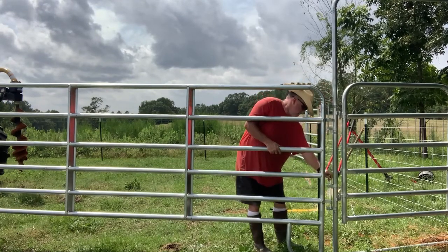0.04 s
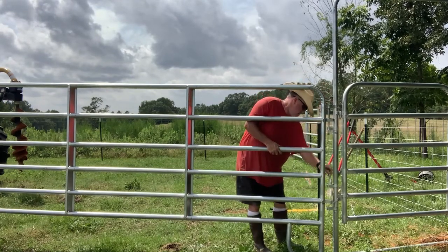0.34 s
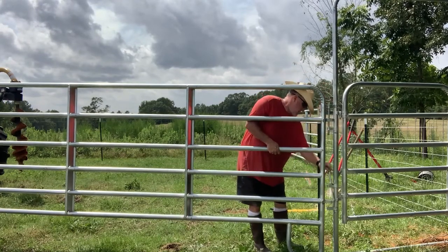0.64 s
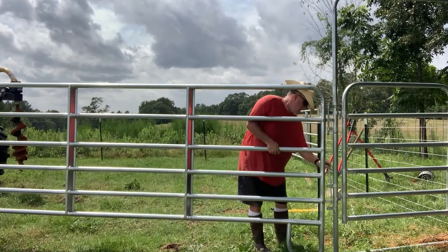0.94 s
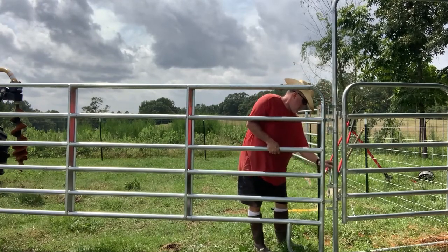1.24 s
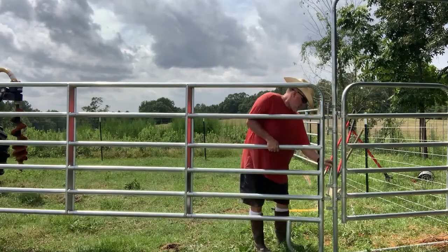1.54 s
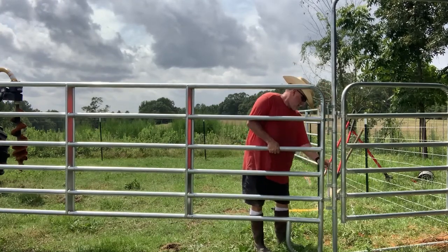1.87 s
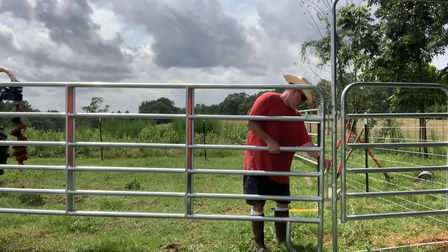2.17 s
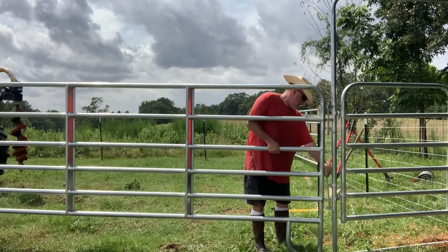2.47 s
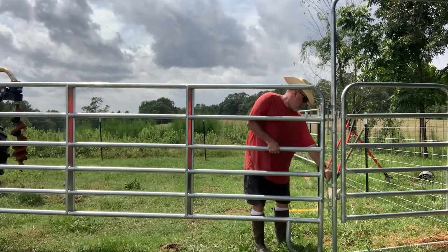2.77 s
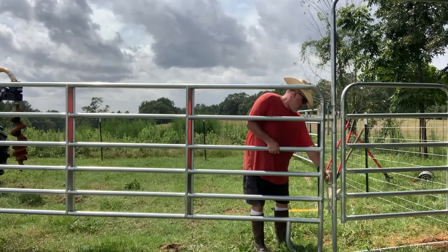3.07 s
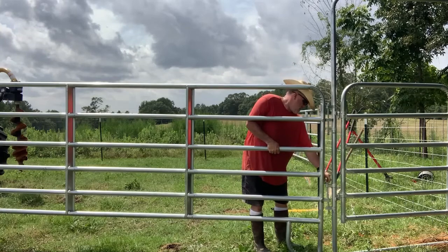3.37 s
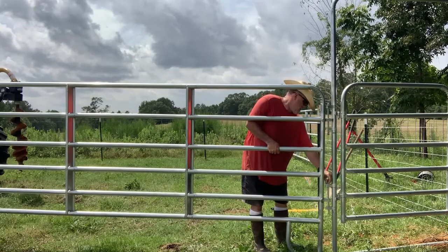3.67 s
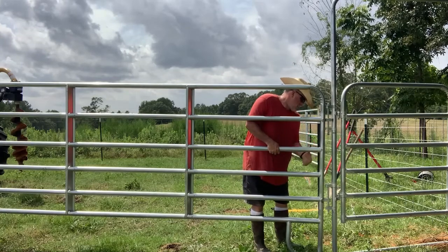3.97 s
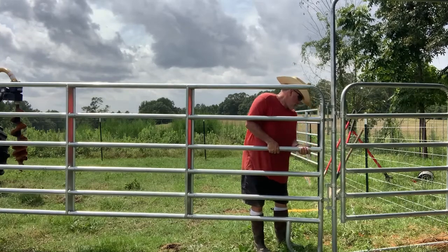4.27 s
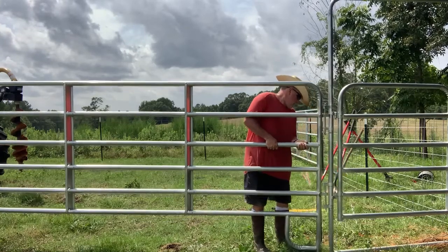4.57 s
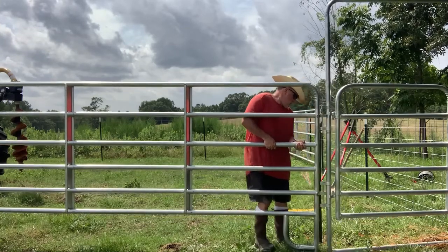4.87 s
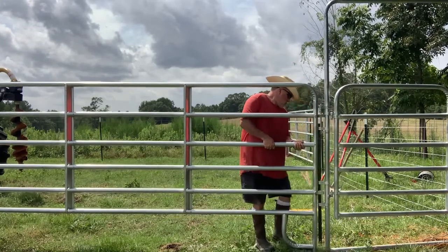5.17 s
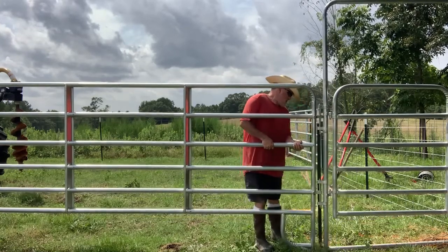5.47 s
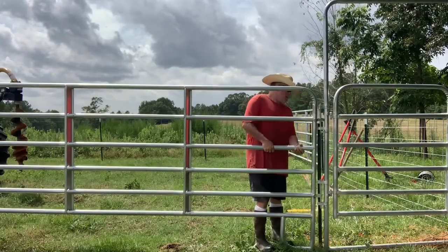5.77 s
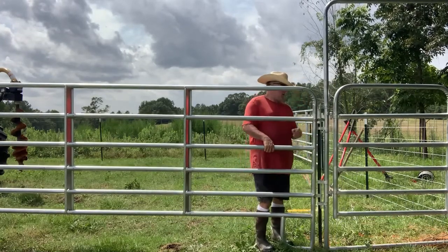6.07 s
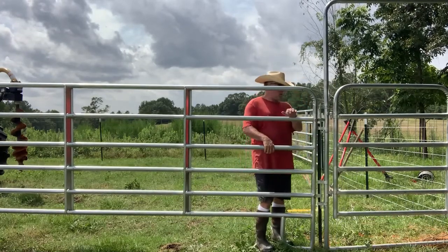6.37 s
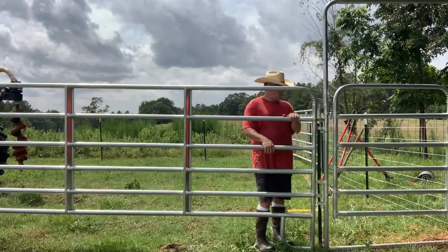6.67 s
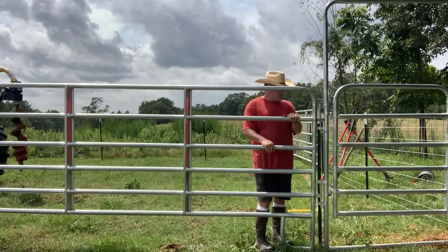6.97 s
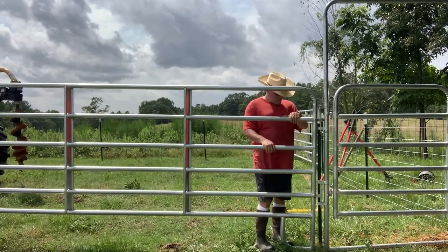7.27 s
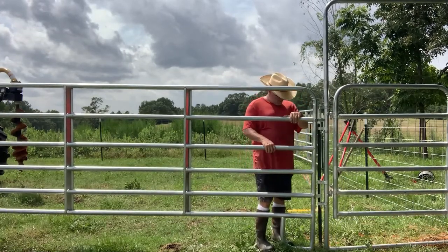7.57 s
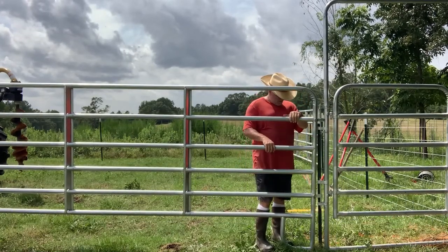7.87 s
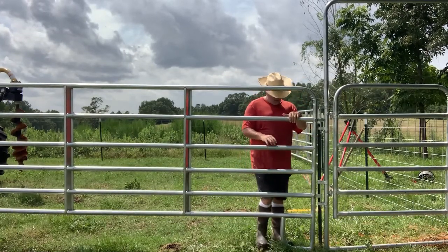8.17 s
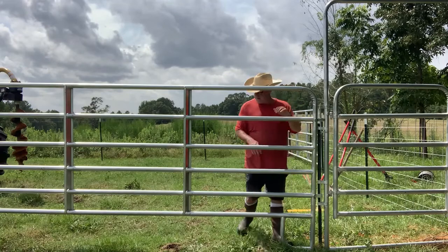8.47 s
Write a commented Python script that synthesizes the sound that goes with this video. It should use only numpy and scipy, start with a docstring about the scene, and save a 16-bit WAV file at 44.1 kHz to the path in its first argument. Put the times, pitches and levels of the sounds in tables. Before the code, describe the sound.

Steel gate panels clank, rattle and scrape as they are fitted together outdoors, with chain jingles and light wind.

```python
"""Galvanized steel corral panels clank as they are shaken and fitted together in a field, a few metres off.
Each blow cracks, rings hundreds of tube modes and sets a chain and the loose joints chattering.
Tubes stick and slip in short scrapes, a latch pin pings in its sleeve and thin fittings clink.
Underneath, a light wind buffets the microphone, a motor drones far off and insects hiss in the grass."""
import sys
import numpy as np
from scipy import signal
from scipy.fft import rfft, irfft
from scipy.io import wavfile
from scipy.ndimage import uniform_filter1d

SR = 44100
rng = np.random.default_rng(int(sys.argv[2]) if len(sys.argv) > 2 else 0)


def file_out(sig):
    """Save sig as 16-bit WAV at sys.argv[1]."""
    # one column per channel
    cols = np.atleast_2d(sig).T
    # limit, then scale
    lim = np.clip(cols, -1, 1)
    pcm = np.round(lim * 32767).astype(np.int16)
    wavfile.write(sys.argv[1], SR, pcm)


N = 381024
TIME, SCENE_HZ = np.arange(N) / SR, np.arange(N // 2 + 1) * SR / N
RING_S, RING_HZ = np.arange(SR) / SR, np.arange(SR // 2 + 1.)  # axes of a one-second ring

# a blow's four bands, called body, clang, clash and edge: (bottom [Hz], top [Hz])
BANDS = [(400, 1900), (2000, 3500), (4000, 8000), (10000, 12500)]
# tube strikes tube: (time [s], body level [dB], clang over body [dB], clash over body [dB],
# bite = edge over clash [dB], favoured note [Hz])
TUBE_STRIKES = [(0.024, -34, -12, -4.5, -5, 1280), (0.057, -29.5, -9, -7, 4, 860),
                (0.221, -25.5, -11, -19, -4, 1420), (0.302, -25, -12, -8.5, 2, 1450),
                (0.503, -39.5, -11, -11, 4, 1320), (0.672, -44, -6.5, -10.5, -10, 1050),
                (0.785, -45, -7, -6, -2, 1380), (0.821, -29.5, -7, -9, 7, 1400),
                (1.076, -49.5, -2, -5.5, -7, 940), (1.371, -15.5, -8.5, -24.5, -4.5, 1470),
                (1.419, -20, -12, -39, 9, 1350), (1.666, -24.5, -19.5, -16, -9, 680),
                (1.847, -25, -12, -6, 3, 980), (1.977, -28.5, -14, -6, -8.5, 1410),
                (2.143, -21.5, -4.5, -7.5, -8, 1280), (2.236, -26.5, -8.5, -12.5, 4, 1210),
                (2.342, -27.5, -12.5, -11, -22, 664), (2.473, -24.5, -15, -18.5, -9, 810),
                (2.859, -29.5, -7, -10.5, 7.5, 1090), (3.307, -42, -10, -19, -12, 970),
                (3.47, -35.5, -10.5, -14, -13, 875), (3.531, -37.5, -10, -7, 1, 880),
                (3.536, -35.5, -20, -12.5, 1, 1120), (4.175, -51.5, -13, -12, 0, 1480),
                (4.441, -28, -7.5, -8, -14, 1780), (4.54, -27, -14, -4.5, -5, 920),
                (4.755, -32.5, -7, -10, -20, 1280), (4.797, -25.5, -12, -6, -7.5, 870),
                (4.952, -20.5, -4, -2, -2.5, 542), (5.059, -32.5, -6, -9.5, -6, 504),
                (5.147, -41.5, -13, -6.5, -4, 520), (5.193, -22.5, -7.5, -2, -4.5, 1610),
                (5.28, -22, -15, -3, -7.5, 1680), (5.316, -36, -16, 5, 7, 1400),
                (5.322, -26, -7.5, 2.5, -2, 670), (5.41, -35, -4, 1, -6, 1310),
                (5.425, -27.5, -13, -3, -6, 1710), (5.488, -39, -5, 0.5, -7.5, 1300),
                (5.552, -27.5, -11.5, -6, -33, 1710), (5.652, -27.5, -7, -3.5, -11, 1330),
                (5.666, -29, -9.5, 5, -7.5, 660), (5.863, -38, -10.5, -3, -12, 1810),
                (5.943, -31, -5, -3, -23, 1640), (6.078, -37.5, -8, -1, -7.5, 1340),
                (6.153, -40.5, -3, -0.5, -14, 525), (6.199, -37.5, -11, -29, -21, 530),
                (6.283, -36, -8, -11, -16, 1060), (6.628, -40, -14, -11.5, -43, 580),
                (6.689, -32.5, -8, -6, -5.5, 1760), (6.727, -32, -20, -10, 0, 1490),
                (6.751, -31, -9, -3.5, -4, 1150), (6.848, -24.5, -9.5, -2.5, -7.5, 1900),
                (6.907, -29, -10, -6.5, -7.5, 1500), (7.032, -22, -9.5, -5, -6, 1240),
                (7.051, -21.5, -6.5, -1.5, -11, 1040), (7.102, -30, -11, 3.5, -1, 1400),
                (7.228, -32.5, -9, -5, -26, 1720), (7.368, -29.5, -5, -6, -19, 1530),
                (7.644, -51.5, -15, -6, -23, 1450), (7.721, -49, -11, -9, -30, 1370),
                (8, -46, -24, -11, 1, 1760), (8.078, -50.5, -9, -7.5, -26, 1360),
                (8.433, -52.5, -12, -6, -17, 460), (8.511, -50.5, -16, -7, -12, 940),
                (8.567, -52, -17, -5, -27, 1740)]
# a swinging panel rocks back with a dull bump: (time [s], body level [dB], favoured note [Hz])
PANEL_BUMPS = [(0.005, -24.5, 790), (0.179, -25.5, 840), (1.541, -27, 1070), (1.62, -29.5, 990),
               (1.773, -30.5, 870), (1.84, -21.5, 960), (2.486, -29, 795)]
# the strong, singing tube modes: (frequency [Hz], level [dB], t60 [s])
TUBE_MODES = [(442, -14, 0.37), (481.6, 3, 0.6), (533, -2.5, 0.95), (574.5, -3, 0.76), (652.6, 16, 0.13),
              (842, -5, 0.73), (952, -4, 0.42), (1013, 1, 0.53), (1163, -13, 1), (1246, -10, 0.76),
              (1270, -5.5, 0.6), (1370, 0, 0.5), (1380, -5, 0.16), (1640, 4, 0.39), (1720, 6.5, 0.43),
              (1830, 4.5, 0.32), (2070, -5, 0.38), (2120, 5, 0.38), (2320, 9, 0.31), (2750, -4, 0.11),
              (4570, -19, 0.22), (6900, -2, 0.35), (11500, -18, 0.1)]
# tone of the crowd of weak modes: (frequency [Hz], spectral level [dB])
CROWD_TONE = [(140, -8), (230, 1.5), (330, 3.5), (520, 11), (750, 2.5), (1300, 3), (1800, 0), (2400, -1.5),
              (3200, -3), (5500, -10), (8000, -8), (12000, -15.5), (13500, -22.5), (15500, -36)]
# ring time of the crowd's tail: (frequency [Hz], t60 [s])
CROWD_DECAY = [(300, 0.38), (600, 0.36), (1200, 0.58), (2400, 0.63), (5000, 0.67), (9000, 0.24),
               (14000, 0.19)]
# modes of the chain links: (frequency [Hz], level [dB], t60 [s])
LINK_MODES = [(2390, 2.5, 0.14), (2753, 8, 0.13), (3640, -17, 0.12), (3840, 4, 0.13), (4260, -12.5, 0.24),
              (4580, -22, 0.092), (5470, -3, 0.19), (5900, 6.5, 0.085), (6380, 5.5, 0.11),
              (7060, -0.5, 0.12), (7270, 1.5, 0.083), (8000, -19, 0.088), (7800, -14, 0.066),
              (8400, -2, 0.15), (10300, -9, 0.25), (12000, -10, 0.14), (11500, -22, 0.12)]
# tube drags on tube: (time [s], length [s], body level [dB], treble level [dB])
TUBE_DRAGS = [(0.25, 0.063, -34, -46.5), (0.865, 0.11, -47.5, -43.5), (1.343, 0.013, -42, -54),
              (1.377, 0.026, -41, -40.5), (1.832, 0.047, -37, -49), (2.263, 0.078, -41, -48),
              (2.843, 0.028, -38, -42), (3.449, 0.007, -46, -59), (4.352, 0.11, -49, -58.5),
              (5.292, 0.11, -37, -39), (5.555, 0.039, -32.5, -46), (5.999, 0.19, -46, -58.5),
              (6.718, 0.035, -35.5, -45), (7.022, 0.13, -32.5, -34)]
# hits on the latch pin: (time [s], level [dB], lift of the edge-band modes [dB], pitch shift [Hz])
LATCH_HITS = [(0.058, -57, 10, 0), (0.23, -47, 19, -8), (0.503, -66, 21, -2), (0.785, -52, 3, 2),
              (0.821, -27.5, 3, -48), (0.917, -42, 18, -60), (2.235, -35.5, 11, 4), (3.448, -59, -5, 0),
              (3.533, -59, 0, 0), (5.447, -42, 3, -40)]
# modes of the latch pin: (frequency [Hz], level [dB], t60 [s])
LATCH_MODES = [(2820, -2, 0.3), (6565, 2.5, 0.3), (6160, -8, 0.17), (7020, -16, 0.13), (9700, -14, 0.14),
               (10680, -27, 0.15), (11600, -19, 0.16), (12100, -13, 0.2), (13200, -20, 0.15)]
# light taps on thin fittings: (time [s], level [dB], pitch [Hz])
FITTING_TAPS = [(0.823, -35, 2700), (1.077, -46.5, 2830), (1.09, -58, 4450), (5.943, -34, 2860),
                (6.195, -41.5, 2840), (6.849, -30.5, 2760), (7.37, -49, 2830), (8.001, -54, 3670),
                (8.078, -60, 3500), (8.433, -59, 3940), (8.567, -55, 3700)]
# strength of the breeze: (time [s], level [dB])
BREEZE = [(0.0, -38), (0.42, -71), (0.72, -50), (0.92, -60), (1.03, -54), (1.25, -54), (1.5, -60),
          (1.95, -53), (2.3, -43.5), (2.55, -53), (2.9, -53), (3.45, -56), (3.7, -57), (4.15, -67),
          (4.4, -47), (4.7, -57.5), (5.6, -56), (5.92, -45), (6.25, -53), (6.45, -50.5), (6.7, -44.5),
          (7.0, -48.5), (7.35, -49.5), (7.65, -56), (7.85, -51.5), (8.05, -46), (8.25, -56), (8.64, -47)]
# wind thumps on the microphone: (time [s], pitch [Hz], half-length [s], level [dB])
WIND_THUMPS = [(0.439, 55.7, 0.019, -29), (0.901, 90, 0.011, -35), (1.119, 80.5, 0.01, -38),
               (1.215, 61.7, 0.025, -32.5), (1.273, 50, 0.033, -57), (2.194, 57.5, 0.13, -41.5),
               (2.345, 131, 0.0068, -20), (2.362, 66, 0.012, -22), (2.625, 60, 0.015, -34),
               (3.135, 73, 0.012, -36.5), (3.388, 86, 0.019, -53), (3.421, 66.6, 0.0093, -30.5),
               (3.499, 60, 0.0099, -33.5), (4.153, 69.6, 0.0091, -30), (6.261, 50.7, .025, -37),
               (6.678, 65, 0.012, -43), (7.018, 58, 0.019, -39), (7.61, 76, 0.01, -25),
               (7.983, 54.4, 0.025, -38.5), (8.094, 60.3, 0.0092, -36.5)]
# tone of the open air: (frequency [Hz], spectral level [dB])
AIR_TONE = [(40, 0), (130, -1), (220, -9.5), (350, -9), (700, -17.5), (1400, -25.5), (2200, -32),
            (4000, -27), (6500, -36.5), (12000, -33.5), (15500, -39)]
# insect choruses: (centre [Hz], width [Hz], level [dB])
INSECT_BANDS = [(7750, 320, -73.5), (8360, 170, -66.5), (10300, 190, -71), (10780, 53, -74)]
# stereo width: (frequency [Hz], side over mid [ratio])
STEREO_WIDTH = [(100, 0.6), (400, 0.3), (1100, 0.53), (2400, 0.35), (5000, 0.8), (7500, 0.023),
                (15000, 0.025)]
# phase between the microphone's channels: (frequency [Hz], lead of the left [rad])
MIC_PHASE = [(0, 0), (1400, -.15), (2000, -1), (2900, -3.1), (4400, -3.9), (5700, -3.1), (7100, -.1),
             (7600, .1), (9400, 3.1), (11200, 6.2), (11900, 6.5), (13200, 9.4), (14700, 12.5),
             (16000, 12.6)]
# balance of the microphone's channels: (frequency [Hz], left over right [dB])
MIC_BALANCE = [(150, 1.3), (500, 1.5), (1000, -2), (2000, -1.5), (8000, -0.3)]

BUMP_COLOUR_DB = (-23, -16.5, -26.5)  # a bump's clang, clash and edge over its body
# load on the joints bends the pitch: fraction from blow to blow, fraction while ringing, changes per s
LOAD_DETUNE, LOAD_WAVER, LOAD_RATE = 0.004, 0.004, 45
# sharp contacts of light parts knock and shake the frame less, in dB per dB of bite
KNOCK_PER_BITE, RATTLE_PER_BITE = -0.18, -0.33


def clanks(modes, trim_db=(-3, -4, -7, -3), crack_db=2.5, crack_s=0.0014, grit_db=-13, grit_s=0.036):
    """Each blow layers a crack of contact, gritty rebounds, the frame's ring and the chain's jangle."""
    out = np.zeros((2, N))
    crack_tone = undb(on_log(RING_HZ, [(1000, -16), (3000, -13), (8000, 59), (12000, -3), (16000, 4)]))
    attack = 1 - np.exp(-RING_S / 0.0006)
    for s, levels_db, note_hz in blows():
        _, _, clash, edge = levels_db
        frame = frame_ring(modes, levels_db + trim_db, note_hz)
        snap = undb(crack_db) * np.exp(-RING_S / crack_s)
        grit = undb(grit_db + 6 * wander(302, SR)) * np.exp(-RING_S / grit_s)
        sizzle = unit(irfft(crack_tone * contact_ripple() * stereo(RING_HZ)))
        crack = undb((clash + edge) / 2) * sizzle * (snap + grit)
        add(out, s, (frame + crack) * attack)
        add(out, s, chain(levels_db))
    return out


def blows():
    """Every strike and bump as (time [s], levels of the four bands [dB], favoured note [Hz])."""
    strikes = [(s, db + np.array([0, clang, clash, clash + bite]), note_hz)
               for s, db, clang, clash, bite, note_hz in TUBE_STRIKES]
    return strikes + [(s, db + np.array([0, *BUMP_COLOUR_DB]), hz) for s, db, hz in PANEL_BUMPS]


def panel_modes(spacing_hz=3.5, thinning_hz=3400, uneven_db=1.0, build_s_at_1khz=0.029):
    """The welded frame's voice: a random crowd of weak modes and the decaying notes of the strong ones."""
    present = rng.random(len(RING_HZ)) < 1 / (spacing_hz * (1 + (RING_HZ / thinning_hz) ** 2))
    weight = present * undb(uneven_db * rng.standard_normal(len(RING_HZ)))
    local_rms = np.sqrt(np.abs(uniform_filter1d(weight ** 2, size=300)) + 1e-9)
    crowd = weight / local_rms * undb(on_log(RING_HZ, CROWD_TONE)) * (RING_HZ > 100)
    hz, db, t60 = np.transpose(TUBE_MODES)[:, :, None]
    bloom = 1 - np.exp(-RING_S * hz / (build_s_at_1khz * 1000))
    notes = undb(db) * np.exp(2j * np.pi * hz * RING_S) * decay(t60) * bloom
    return crowd, notes


def frame_ring(modes, levels_db, note_hz, tubes_db=-15):
    """One blow rings the crowd and the long tube notes, which waver with the load on the joints."""
    crowd, notes = modes
    hz = np.array(TUBE_MODES)[:, 0]
    low_lift_db = on_log(hz, [(420, knock_db(levels_db)), (750, 0.0038)])
    drive_db = blow_db(hz, levels_db) + favour_db(hz, note_hz) + low_lift_db
    share = stereo(hz)
    share /= np.mean(np.abs(share), axis=0) ** 0.11  # evens out the strong modes a little
    tubes = ((share * undb(drive_db + tubes_db)) @ notes).real
    playhead = np.cumsum(1 + LOAD_DETUNE * rng.standard_normal() + LOAD_WAVER * wander(LOAD_RATE, SR))
    bent_tubes = np.array([np.interp(playhead, np.arange(SR), side) for side in tubes])
    return crowd_ring(crowd, levels_db, note_hz) + bent_tubes


def crowd_ring(crowd, levels_db, note_hz, build_s_at_1khz=0.0071, tail_db=-8, chatter_db=-1.0):
    """The metallic wash of weak modes: the load bends them and each contact point weights them anew."""
    bent = np.rint(RING_HZ * (1 + LOAD_DETUNE * rng.standard_normal())).astype(int)
    weights = crowd.take(bent, mode="clip") * contact_ripple() * undb(favour_db(RING_HZ, note_hz))
    own_db = [10 * np.log10(2 * np.sum(weights[lo:hi] ** 2) / SR ** 2) for lo, hi in BANDS]
    body, clang, clash, edge = np.array(levels_db) - own_db
    eq = [(400, body + knock_db(levels_db)), (720, body), (1650, body), (2300, clang), (3200, clang),
          (4200, clash), (7500, clash), (10500, edge)]
    struck = weights * undb(on_log(RING_HZ, eq)) * stereo(RING_HZ)
    centres = np.array(CROWD_DECAY)[:, 0]
    out = 0
    for (hz, t60), pick in zip(CROWD_DECAY, np.eye(len(CROWD_DECAY))):
        band = on_log(RING_HZ, np.c_[centres, pick])
        # bending waves carry the treble along the tubes first; the lows bloom later
        arrival = 1 - np.exp(-RING_S / (build_s_at_1khz * 1000 / hz))
        # the struck tube soon gives its energy away, then the whole frame rings on
        fade = decay(0.24 * t60) + undb(tail_db) * decay(t60)
        out = out + irfft(struck * band) * arrival * fade
    return out * undb(chatter_db * wander(130, SR))


def blow_db(hz, levels_db):
    """How hard a blow drives each frequency, sliding between its four band levels."""
    return on_log(hz, np.c_[np.mean(BANDS, axis=1), levels_db])


def knock_db(levels_db, base_db=4, hardness_share=0.6):
    """Low-end weight: a hard, square blow knocks the whole frame; a glancing one does not."""
    body, _, clash, edge = levels_db
    return base_db + hardness_share * (clash - body) + KNOCK_PER_BITE * max(edge - clash, 0)


def favour_db(hz, note_hz, lift_db=7.5, width=0.13):
    """The struck spot rings most strongly near one note."""
    return lift_db * np.exp(-((hz / note_hz - 1) / width) ** 2)


def contact_ripple(width_hz_at_1khz=115, depth_db=6):
    """A contact point favours some modes: random dips and capped humps across the spectrum."""
    knots = np.minimum(rng.standard_normal(1024), 1)
    place = np.sqrt(RING_HZ * 1000) * 2 / width_hz_at_1khz  # humps widen toward the treble
    return undb(depth_db * np.interp(place, np.arange(len(knots)), knots))


def chain(levels_db, gain_db=-14, detune=0.012, gap_s=0.026, bounce_db=-3, fade_db_per_s=85, bounces=3):
    """The chain jumps with the blow and its links fall back, each bounce with a slightly new ring."""
    hz, db, t60 = np.transpose(LINK_MODES)
    drive = undb(blow_db(hz, levels_db) + db + gain_db)
    t = RING_S[:SR // 4]
    envelope = decay(t60[:, None], t) * (1 - np.exp(-t / 0.00017))
    delays = np.r_[0, np.cumsum(gap_s * rng.gamma(2, .5, bounces))]
    out = np.zeros((2, SR))
    for k, delay in enumerate(delays):
        link_hz = hz * (1 + detune * rng.standard_normal(len(hz)))
        phase = 2 * np.pi * link_hz[:, None] * t
        share = stereo(hz)
        share /= np.mean(np.abs(share), axis=0) ** .5
        share *= drive * undb(bounce_db * (k > 0) - fade_db_per_s * delay)
        jingle = share.real @ (envelope * np.sin(phase)) + share.imag @ (envelope * np.cos(phase))
        add(out, min(delay, .5), jingle)
    return out


def scrapes(modes, slips_per_s=600):
    """Tube drags on tube: the zinc sticks and slips in quick, uneven steps."""
    out = np.zeros((2, N))
    for s, length, body, treble in TUBE_DRAGS:
        pressure = np.sin(np.pi * np.minimum(RING_S / length, 1)).clip(0) ** 0.15
        force = undb(body) * pressure * taps(SR, slips_per_s, scatter_db=3)
        add(out, s, shaken_frame(modes, force, treble - body, clang_db=-5.5, edge_db=-3.5,
                                 note_hz=1665, tubes_db=-17))
    return out


def rattle(modes, taps_per_s=135, turns=14, note_range_hz=(494, 1306)):
    """Loose joints take turns tapping as the panels sway, and keep the hollow tubes singing."""
    out = np.zeros((2, N))
    force = sway() * taps(N, taps_per_s, scatter_db=3.5)
    for k, turn in enumerate(np.array_split(force, turns)):
        chatter = shaken_frame(modes, turn, treble_db=-19, clang_db=-3.5, edge_db=-6.5,
                               note_hz=rng.uniform(*note_range_hz), tubes_db=-20.5)
        add(out, k * N / turns / SR, chatter)
    return out


def sway(send_db=-17, build_s=0.0055, fade_db_per_s=66.5, handling_db=-72):
    """The rattle's envelope: each blow adds energy that drains away; hands keep the joints astir."""
    energy = np.full((1, N), undb(handling_db) ** 2)
    shape = (1 - np.exp(-RING_S / build_s)) * undb(send_db - fade_db_per_s * RING_S)
    for s, (body, _, clash, edge), _ in blows():
        add(energy, s, (undb(body + RATTLE_PER_BITE * (edge - clash)) * shape) ** 2)
    return np.sqrt(energy[0])


def shaken_frame(modes, force, treble_db, clang_db, edge_db, note_hz, tubes_db):
    """The frame rings in answer to a train of small impacts at one spot."""
    levels_db = (0, treble_db / 2 + clang_db, treble_db, treble_db + edge_db)
    response = frame_ring(modes, levels_db, note_hz, tubes_db)
    energy = np.mean(np.sum(response ** 2, axis=1))
    response *= np.sqrt((1 + undb(treble_db) ** 2) / energy)
    return signal.fftconvolve(force[None], response, axes=1)


def latch_pin(buzz_db=3, buzz_rate=260, jostle_cycles=0.25, jostle_rate=220, clean_s=0.025):
    """The loose pin starts with a clean, high clink; then rattling in its sleeve roughens each mode."""
    out = np.zeros((2, N))
    loose = 1 - np.exp(-RING_S / clean_s)
    for s, level_db, lift_db, shift_hz in LATCH_HITS:
        for hz, db, t60 in LATCH_MODES:
            cycles = (hz + shift_hz) * RING_S + rng.random()
            jostle = jostle_cycles * loose * wander(jostle_rate, SR)
            mode_db = level_db + db + lift_db * (hz > BANDS[-1][0])
            gain = undb(mode_db + buzz_db * loose * wander(buzz_rate, SR))
            add(out, s, gain * np.sin(2 * np.pi * (cycles + jostle)) * decay(t60))
    return out


def fittings(t60=0.13, jostle_cycles=0.3, jostle_rate=700):
    """Light taps on loose fittings: each a short, rough clink on one high note."""
    out = np.zeros((2, N))
    stereo_phase = np.array([[0], [np.pi / 2]])
    for s, db, hz in FITTING_TAPS:
        phase = 2 * np.pi * (hz * RING_S + jostle_cycles * wander(jostle_rate, SR))
        add(out, s, undb(db) * decay(t60) * np.sin(phase + stereo_phase))
    return out


def wind(trim_db=-2.5, eddy_db=7, eddy_rate=7.5, wake_db=-15, wake_s=0.073):
    """Rumble rides the breeze and its eddies; buffets thump the microphone amid their own turbulence."""
    tone = undb(on_log(SCENE_HZ, [(10, -34), (28, -21), (50, 3.5), (75, -4), (120, -8.5), (200, -19.5),
                                  (400, -31), (1500, -112)]))
    breeze_db = np.interp(TIME, *np.transpose(BREEZE))
    strength = undb(breeze_db + trim_db + eddy_db * wander(eddy_rate, N))
    thumps = np.zeros(N)
    for s, hz, half_s, db in WIND_THUMPS:
        t = TIME - s
        thumps += undb(db) * np.exp(-(t / half_s) ** 2) * np.cos(2 * np.pi * hz * t)
        turbulence = undb(db + wake_db) * np.exp(-np.abs(t) / wake_s)
        strength = np.hypot(strength, turbulence)
    return noise(tone) * strength + thumps


def motor(hz=118.5, level_db=-59.5, waver=0.01245, waver_rate=7, swell_db=2, swell_rate=5):
    """A far-off motor drones on one low, wavering note."""
    phase = 2 * np.pi * np.cumsum(hz * (1 + waver * wander(waver_rate, N))) / SR
    return np.sqrt(2) * undb(level_db + swell_db * wander(swell_rate, N)) * np.sin(phase)


def field(air_db=-56, flicker_db=1, flicker_rate=31):
    """The ambient bed: distant air, and insects whose high hiss flickers gently."""
    out = undb(air_db + 0.097 * wander(7.2, N)) * noise(undb(on_log(SCENE_HZ, AIR_TONE)))
    for hz, width, db in INSECT_BANDS:
        band = np.exp(-((SCENE_HZ - hz) / width) ** 2 / 4)
        out += undb(db + flicker_db * wander(flicker_rate, N)) * noise(band)
    return out


def undb(db):
    """Decibels to gain."""
    return 10 ** (np.asarray(db) / 20)


def on_log(hz, table):
    """Read (frequency [Hz], value) rows on a log-frequency axis."""
    at, value = np.transpose(table)
    return np.interp(np.log(hz + 1e-3), np.log(at), value)


def unit(x):
    """Scale to rms 1."""
    return x / np.sqrt(np.mean(x ** 2))


def add(out, s, x):
    """Mix x into out from time s."""
    i = max(int(s * SR), 0)
    out[:, i:i + x.shape[-1]] += x[..., :N - i]


def decay(t60, t=RING_S):
    """An envelope that falls 60 dB in t60 seconds."""
    return np.exp(-np.log(1000) * t / t60)


def wander(rate, size):
    """A random modulator that glides to a new value rate times a second."""
    knots = rng.standard_normal(4096)
    return 0.875 * np.interp(np.arange(size) / SR * rate, np.arange(len(knots)), knots)


def taps(size, rate, scatter_db):
    """Irregular tiny impacts of uneven strength, rms 1."""
    hits = rng.random(size) < rate / SR
    return unit(hits * undb(scatter_db * rng.standard_normal(size)) + 1e-9)


def stereo(hz):
    """A random strength and phase at each frequency, partly shared by left and right."""
    mid, side = rng.standard_normal((2, len(hz))) + 1j * rng.standard_normal((2, len(hz)))
    width = on_log(hz, STEREO_WIDTH)
    return (mid + width * side * np.array([[1], [-1]])) / np.sqrt(2 + 2 * width ** 2)


def noise(tone):
    """Stereo noise of rms 1 with the given spectrum."""
    return unit(irfft(tone * stereo(SCENE_HZ), N))


def scene():
    """The mix: steel up front, over wind, motor and field."""
    modes = panel_modes()
    steel = clanks(modes) + scrapes(modes) + rattle(modes) + latch_pin() + fittings()
    return steel + wind() + motor() + field()


def record(dry, top_hz=16100):
    """A phone's channels part in phase toward the treble, the mids lean right and the top is cut."""
    lead = np.interp(SCENE_HZ, *np.transpose(MIC_PHASE))
    balance_db = on_log(SCENE_HZ, MIC_BALANCE)
    split = np.array([[.5], [-.5]])  # half to each channel, in opposite directions
    channels = irfft(rfft(dry) * np.exp(1j * lead * split) * undb(balance_db * split), N)
    return signal.sosfilt(signal.ellip(10, .2, 70, top_hz, fs=SR, output="sos"), channels)


dry = scene()
out = record(dry)
file_out(out)
```